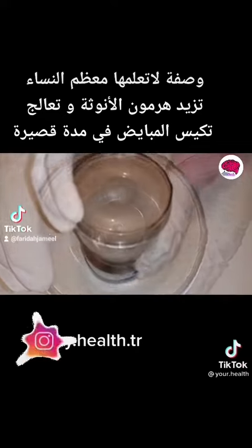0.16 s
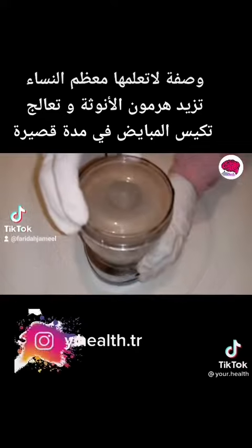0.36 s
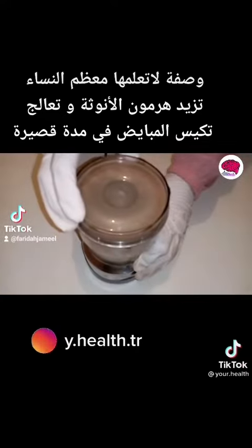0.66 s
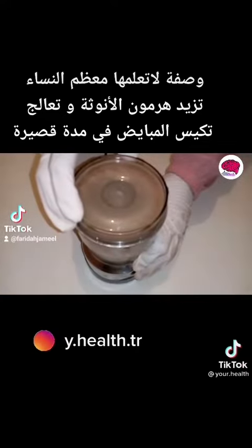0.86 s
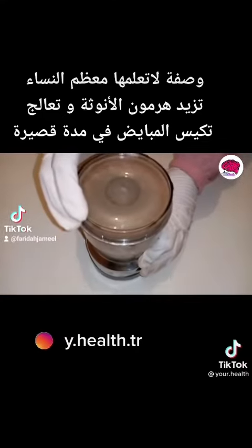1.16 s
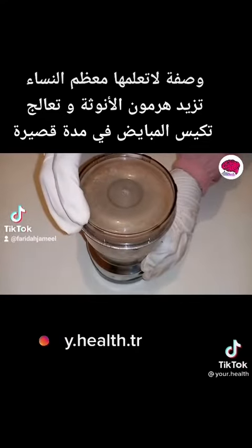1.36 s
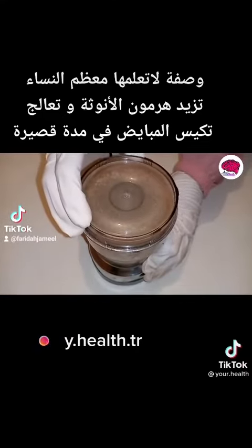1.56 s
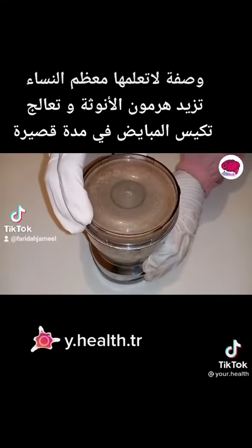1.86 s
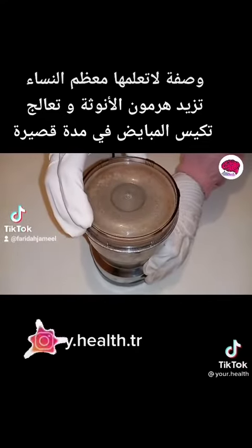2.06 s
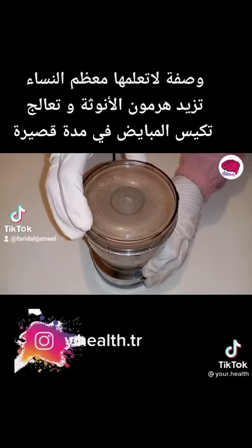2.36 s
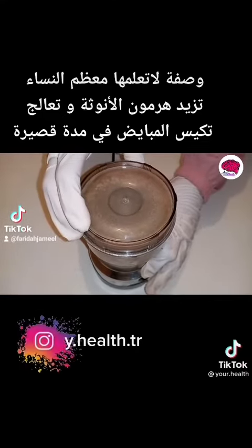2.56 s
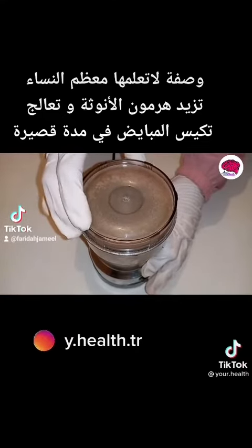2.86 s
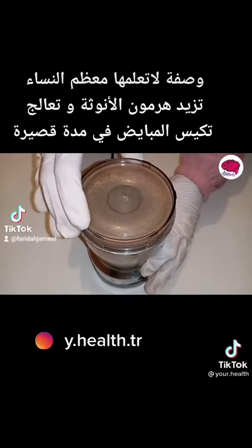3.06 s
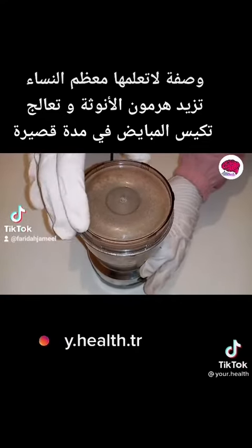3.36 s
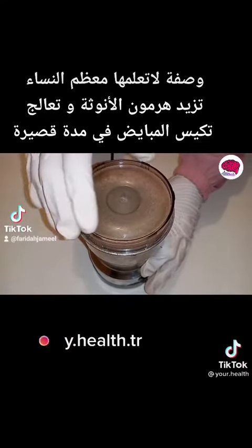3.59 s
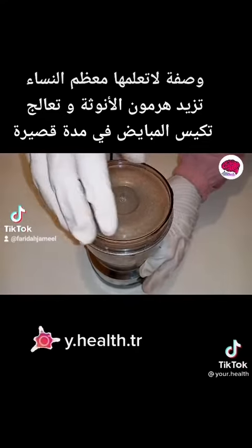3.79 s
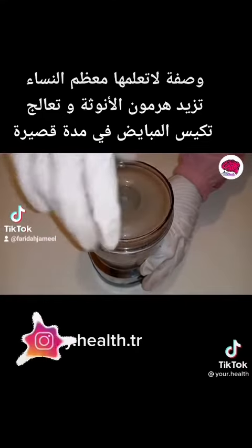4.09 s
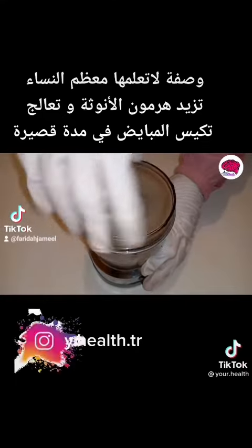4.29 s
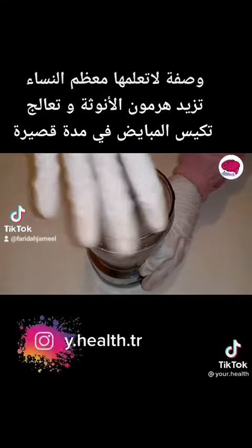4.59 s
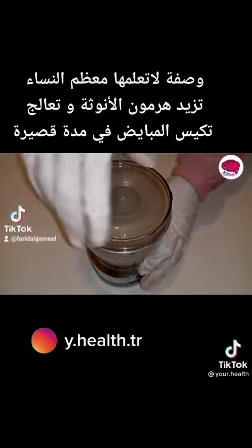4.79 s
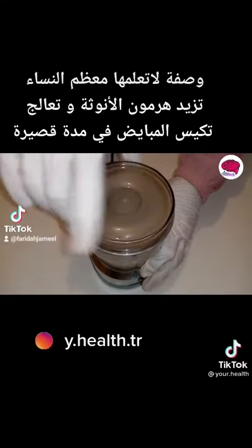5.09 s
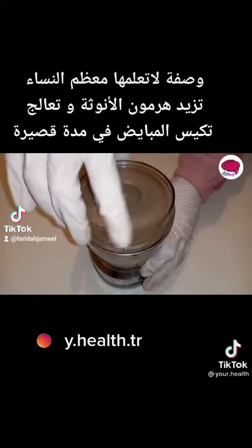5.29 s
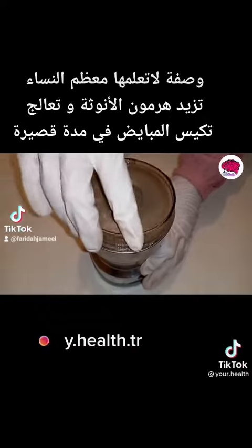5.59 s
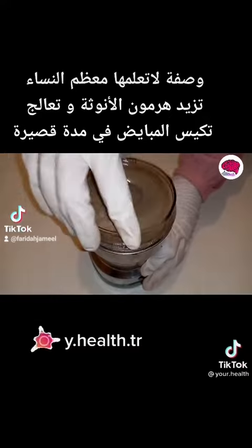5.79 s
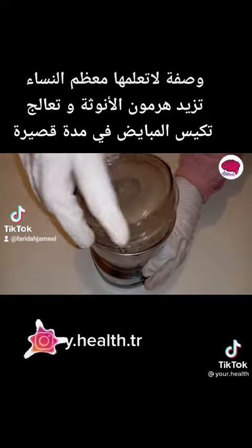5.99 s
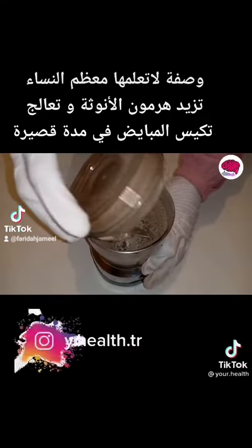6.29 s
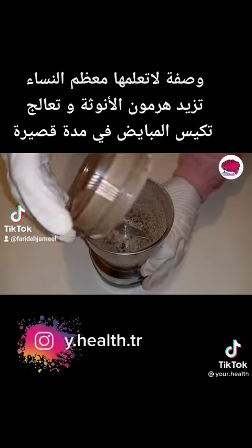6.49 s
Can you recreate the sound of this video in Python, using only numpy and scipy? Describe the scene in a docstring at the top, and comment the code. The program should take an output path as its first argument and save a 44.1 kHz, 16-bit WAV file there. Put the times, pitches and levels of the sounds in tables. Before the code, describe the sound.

A small blade grinder runs at full speed close by, a bright nasal whine over hissing powder and occasional lump knocks. After about two seconds it is switched off; the whine slides lower and fades while grains rattle, ending in a short faint squeak. Then a hand turns the plastic lid with short dry scrapes, knocks and clicks, and light hollow bumps as it lifts. Small kitchen, close stereo microphone, quiet room air.

```python
"""A small blade grinder whines at full speed, with powder hissing and lumps knocking in its bowl.
It is switched off and coasts down: the whine, a sum of sines at multiples of the shaft speed, slides lower.
A short squeak follows, then a gloved hand unscrews the plastic lid with scrapes, knocks and clicks and
lifts it off. Scrapes are noise through resonances; knocks are short bursts with ringing tones.
Two microphone ports pick it all up in a small kitchen."""
import sys
import numpy as np
from scipy import signal
from scipy.fft import rfft, irfft, next_fast_len
from scipy.io import wavfile
from scipy.ndimage import uniform_filter1d, map_coordinates

SR = 44100
rng = np.random.default_rng(int(sys.argv[2]) if len(sys.argv) > 2 else 0)


def dump(signal):
    """Clip the signal to [-1, 1] and save it as 16-bit WAV at the path in sys.argv[1]."""
    limited = np.clip(np.atleast_2d(signal).T, -1, 1)
    pcm = np.round(limited * 32767).astype(np.int16)
    wavfile.write(sys.argv[1], SR, pcm)


def voltage_ratio(decibels):
    """Convert decibels (scalar or array-like) to amplitude ratios, 20 dB per decade."""
    exponent = np.asarray(decibels, float) / 20
    return 10 ** exponent


N = 293265  # length of the sound [samples]

# shaft speed under power, sagging as powder loads the blade: (time [s], speed [turns/s])
SPEED = [(0, 543.5), (.12, 543.5), (.2, 541.3), (.43, 540.5), (.68, 527), (.88, 526.8), (1.08, 521),
         (1.17, 515), (1.32, 520.5), (1.52, 516), (1.75, 518.6), (1.95, 516), (2.04, 517.6), (2.175, 516.5)]
# speeds at heavy, middle and light load: (speed [turns/s])
LOAD_SPEEDS = [517, 527, 541]
# multiples of the shaft speed, before drive and housing: (multiple [1], left level at heavy, middle and
# light load [dB] x 3, right level at the same loads [dB] x 3, phase lead of the left port [rad])
SHAFT_ORDERS = [(1, -19.5, -20, -19, -31, -25.5, -21, 1.83),
                (1.999, -32.5, -38, -32.5, -41.5, -60.5, -46.5, -0.25),
                (3.002, -20.5, -19.5, -19, -33, -35.5, -28, 0),
                (4, -22, -30.5, -32.5, -45, -42.5, -43.5, -0.11),
                (5, -28, -26.5, -20, -31.5, -29.5, -32, -.23),
                (6, -30.5, -29.5, -32.5, -36.5, -43.5, -41.5, -0.04),
                (7, -31.5, -40.5, -28, -40.5, -40, -33, 0.84), (8, -41, -27.5, -31.5, -51.5, -46, -51, 1.5),
                (9, -45, -42, -59, -45.5, -41.5, -42, 1.77), (10, -53.5, -44, -59, -46.5, -50, -50, 1.4),
                (13, -44.5, -46.5, -39, -53.5, -47.5, -44, 1),
                (11, -49.5, -42.5, -36.5, -48, -45, -49, 0.65),
                (12, -32.5, -39, -38.5, -58, -52.5, -51.5, 0.64),
                (14, -40.5, -36.5, -43.5, -51.5, -49, -61, -0.77)]
# overall drive of the whine: (time [s], level [dB])
DRIVE = [(.15, -3.5), (.5, 1), (2.25, -.5), (2.4, -9.5), (2.7, -8.5), (2.95, -18), (3.06, -36),
         (3.12, -65.5)]
# how strongly the housing radiates as the tones slide down: (frequency [Hz], level [dB])
HOUSING = [(120, -4.5), (200, -5.5), (310, -11), (420, -1.5), (520, 4), (700, -12), (870, 6), (1000, 7.5),
           (1150, 0), (1340, -0.5), (1460, -4), (1600, 2), (1850, 0.5), (2100, 2), (2350, -2.5), (2600, -1),
           (2950, 5), (3500, -0.5), (8000, -28.5)]
OFF_S, DRAG_PER_S, FRICTION_HZ_PER_S = 2.175, .92, 175  # switch-off, then air drag and bearing friction
FULL_LOAD_HZ, LOW_ORDERS = 517, 7
# a second, slightly slower whine beats with the first and fades out
BEAT_HZ, BEAT_DIP_S, BEAT_SHARE, BEAT_ENDS_S = 10.3, .05, .55, .3
# orders six to nine swell for a moment while the fifth dips: added dB by order
MOMENT_S, MOMENT_WIDTH_S, MOMENT_DB = 1.15, 0.19, {5: -6, 6: 4.5, 7: 8.5, 8: 10, 9: 8}
# coasting losses: per order above the first, and per squared order above the seventh
FADE_DB_PER_S, TOP_FADE_DB_PER_S = .4, 8
# coasting losses shared by all overtones: a steady one, and one that collapses late
OVERTONE_FADE_DB_PER_S, BLUR_DB_PER_S2 = 8, 36
STOPPED_S = 3.2  # the whine is over

# swirling powder and thrum of the base, the thrum before its boost: (time [s], hiss [dB], thrum [dB])
SWIRL = [(.33, -28.5, -62), (.56, -24, -61), (2.05, -23, -55.5), (2.47, -26.5, -78), (2.8, -24.5, -63),
         (3.15, -30.5, -69), (3.25, -24, -62), (3.36, -34.5, -53), (3.43, -42, -57.5), (3.56, -87, -81)]
# colour of the air roar: (frequency [Hz], level [dB])
ROAR = [(40, -26.5), (100, -24.5), (240, -24.5), (380, -22), (480, -0.5), (580, -3), (670, -38), (780, -31),
        (930, -6.5), (1300, -20.5), (1800, -15), (3000, 3), (4200, -1.5), (6000, -22), (9000, -38)]
# colour of the powder hiss: (frequency [Hz], level [dB])
HISS = [(150, -39.5), (400, -23.5), (640, -23), (770, -26), (900, -10), (1250, -10), (1500, -6), (1850, -2),
        (2240, -5), (3000, -3), (4320, -5), (5300, -7), (6450, -2), (7960, -8), (10500, -8.5),
        (12800, -10.5), (14200, -4), (15000, 0), (16500, 1)]
# colour of the low thrum of the base: (frequency [Hz], level [dB])
THRUM = [(25, -14.5), (60, 0), (110, -1), (200, -17.5), (400, -63)]
# air off the blade: level at the start, end, growth as the powder gets fine, loss while coasting
ROAR_DB, ROAR_ENDS_S, ROAR_GROWS_DB, ROAR_FADE_DB_PER_S = -33, 2.6, 2, 21.5
FINE_FROM_S, FINE_BY_S, RIM_SONG_DB = 0.67, 1.3, -40  # fine powder sings along the rim; level at full hiss

# colour of the kitchen air: (frequency [Hz], level [dB])
AIR_COLOUR = [(20, -23), (60, -2.5), (120, -4.5), (200, -11), (400, -14), (700, -21.5), (1150, -26),
              (1420, -18.5), (1700, -26), (2000, -26), (2900, -22), (4000, -28), (6500, -28.5),
              (9000, -33.5), (16000, -46.5)]
# loudness of the kitchen air: (time [s], level [dB])
AIR_LEVEL = [(3.4, -63.5), (3.7, -64.5), (6.1, -66), (6.3, -65), (6.65, -62)]

# resonances of the base: (centre [Hz], width [Hz], level [dB])
BASE = [(94, 46, -1), (180, 31, -1), (364, 170, -9), (800, 360, -10)]
# resonances of the lid: (centre [Hz], width [Hz], level [dB])
LID = [(650, 50, -11), (866, 25, -3), (935, 110, 1), (1062, 130, 2.5), (1118, 37, -1), (1340, 300, -7),
       (1620, 150, -11), (1860, 220, -10), (2400, 600, -17), (2990, 300, -13), (3470, 420, -17.5)]
# resonances of the rim: (centre [Hz], width [Hz], level [dB])
RIM = [(4300, 900, -12), (5200, 480, -6.5), (6102, 180, 0), (6075, 268, 6), (7090, 367, 0),
       (8700, 1200, -10.5), (14900, 1100, -15.5)]
# resonances of the bowl wall under powder: (centre [Hz], width [Hz], level [dB])
WALL = [(860, 260, 1.5), (1150, 200, -2.5), (1700, 200, -6), (2080, 200, -6), (3000, 280, -1.5)]
# The next three tables give levels before the fixed boosts in knocks().
# hard lumps flung at the bowl: (time [s], base [dB], lid [dB], rim [dB])
LUMPS = [(.139, -23, -28.5, -13), (.31, -36, -32, -25.5), (.499, -42.5, -11.5, -17.5),
         (.88, -42, -22, -18.5), (1.526, -36.5, -20, -21.5), (1.797, -41, -28, -27),
         (2.342, -69.5, -23.5, -24.5), (2.446, -63.5, -25, -23), (2.5, -61.5, -22, -20),
         (2.786, -47, -21, -26), (2.826, -42, -25, -25), (2.925, -24.5, -19, -11.5), (3.012, -60, -30, -25),
         (3.042, -58, -38.5, -22.5), (3.064, -62, -35.5, -15.5), (3.102, -60, -32, -26),
         (3.121, -51.5, -26, -18.5), (3.243, -30, -19, -22), (3.296, -40, -38, -41),
         (3.356, -48, -32.5, -27.5), (3.381, -54, -35, -30.5)]
# the lid knocks and ticks in its thread: (time [s], base [dB], lid [dB], rim [dB])
LID_KNOCKS = [(4.174, -23.5, -29.5, -43), (4.273, -56, -46, -34), (4.481, -57, -33, -57),
              (4.561, -71, -38.5, -46), (4.58, -73, -56, -43.5), (4.826, -51, -17.5, -33),
              (4.858, -30.5, -16, -38), (4.908, -54, -35.5, -22), (4.916, -58, -42, -23),
              (5.059, -58.5, -32, -55), (5.24, -34, -32, -50), (5.35, -47.5, -38.5, -32),
              (5.434, -31, -24.5, -41), (5.461, -48.5, -25.5, -31), (5.47, -27, -10.5, -42.5),
              (5.5, -30, -32, -60), (5.53, -34, -40, -62), (5.64, -72, -46, -62), (5.69, -53, -38, -37.5),
              (5.74, -70, -42, -70), (5.803, -68, -40.5, -31.5), (5.811, -66.5, -64, -26.5),
              (5.829, -58.5, -39.5, -30.5)]
# the tilted lid bumps the bowl: (time [s], base [dB], lid [dB], rim [dB])
BUMPS = [(5.922, -34.5, -31, -37), (5.934, -29.5, -29, -59), (5.965, -45, -41, -56),
         (5.999, -43.5, -46, -56), (6.036, -64, -50, -68)]
# The next three tables give ringing tones; decay is the longest time to fall by 60 dB.
# struck by a lump: (frequency [Hz], level relative to the hit [dB], decay [s])
LUMP_RING = [(375.7, -10.5, 0.027), (1100, -7.5, 0.029), (1390, -4, .015), (2050, -3.5, 0.022),
             (2950, -3, .015)]
# the lid: (frequency [Hz], level relative to the hit [dB], decay [s])
LID_RING = [(375, -14, .05), (800, -6.5, .05), (990, 1.5, 0.037), (1110, -19, .24), (1128, -21, .2),
            (1755, -18, .12), (2340, -21, .12), (2990, -24, .1), (3450, -20, .12), (6260, -5.5, .03),
            (7340, -0.5, .03)]
# the bowl, before it rises in pitch: (frequency [Hz], level relative to the hit [dB], decay [s])
BOWL_RING = [(706, 6.5, 0.13), (783, -3, 0.12), (900, -6, 0.056), (1120, -6, 0.11), (1330, -14, .05),
             (1530, -15, .08), (1760, -17, .08), (3360, -19, 0.073)]
LUMP_RISE_S, LID_RISE_S = .0006, .0016  # a flung lump hits harder than a hand
LOOSE_S, HELD_T60_S = 5.33, 0.03  # until the lid is loose, the thread damps its ring
FREE_S, HOLLOW_LOSS_DB = 5.52, 18  # off the thread, the lid no longer drives the hollow of the bowl
LIFT_S, OPENING_PER_S = 5.95, 1.7  # the hollow rises in pitch as the lid opens: share a second

# the stalling rotor
SQUEAK_S, SQUEAK_LENGTH_S, SQUEAK_HZ, SQUEAK_SAG_HZ_PER_S, SQUEAK_DB = 3.405, 0.13, 886, 130, -42

# strokes of the hand turning the lid:
# (start [s], length [s], scrape [dB], sizzle relative to scrape [dB], rumble relative to scrape [dB])
TURNS = [(3.572, 0.017, -66.5, 10.5, -12), (3.783, .045, -41, -6, -28), (3.857, 0.13, -39, -8, -12),
         (4.07, .107, -35.5, -4, -22), (4.283, .15, -34, -4.5, -10), (4.462, 0.066, -39.5, -9, -30),
         (4.65, 0.045, -65, 4, -22), (4.75, 0.035, -63.5, 11, -20), (4.791, 0.067, -31.5, -8, -19),
         (4.888, 0.029, -40, 0, -4.5), (4.947, 0.094, -64, 10.5, -12), (5.026, 0.07, -35.5, -11, -17),
         (5.093, 0.068, -32.5, -6, -24), (5.229, .094, -36, -3.5, -9.5), (5.321, .06, -51, 7, -19.5),
         (5.413, .025, -47.5, -4.5, 3), (5.45, 0.055, -41, -20, 3.5), (5.632, 0.018, -62.5, 0.5, -23),
         (5.678, .02, -54.5, 4, 7), (5.795, 0.035, -67.5, 26.5, -1), (5.914, 0.021, -56, 1, 3),
         (6.005, 0.037, -71, -21, -8)]
GRIP_S, RELEASE_DB_PER_S, ARCH_DB = 0.017, 433, 1  # a stroke bites fast, is strongest midway, dies off
# the glove brushes faintly along the lid: (start [s], length [s], level [dB], centre [Hz], width [Hz])
BRUSHES = [(4.55, .2, -63, 2050, 130), (6.52, .07, -73, 2780, 450), (6.61, .04, -67, 2400, 1200)]

# how much louder the left port is than the right: (frequency [Hz], difference [dB])
BALANCE = [(60, 4.5), (240, 3.5), (700, 3.5), (1200, 6.5), (2000, 11.5), (3700, -2), (6500, 6.5), (9000, 0),
           (15000, 1.5)]
# share of the sound that comes off the walls: (frequency [Hz], share [0-1])
WET = [(100, .1), (900, .1), (3000, .09), (15000, .07)]
# how long the room rings, as time to fall by 60 dB: (frequency [Hz], decay [s])
ROOM = [(150, 0.075), (1000, 0.25), (6000, 0.21), (15000, 0.02)]
# share of a steady noise that differs from port to port: (frequency [Hz], share [0-1])
OWN = [(60, 0.7), (300, 0.7), (900, 0.3), (2000, 0.6), (5000, 0.9), (15000, 0.7)]
# fixed narrow dips and a steep top edge in the whole mix: (frequency [Hz], level [dB])
MIX_COLOUR = [(20, -6), (50, 0), (3900, 0), (4250, -5), (4600, 0), (11700, 0), (12300, -9), (12900, 0),
              (13400, 0), (13800, -10), (14200, 0), (15500, 0), (15900, -40)]
LAG_S = 0.0010643  # the left port is the farther one


def unit(x):
    """Scale to rms 1."""
    return x / np.sqrt(np.mean(x ** 2) + 1e-20)


def along(points, hz):
    """Read a curve of (Hz, value) points on a log frequency axis."""
    f, v = np.transpose(points)
    return np.interp(np.log(hz + 1), np.log(f + 1), v)


def curves(rows):
    """One value per sample for each column after the time."""
    s, *cols = np.transpose(rows)
    return [np.interp(np.arange(N) / SR, s, c) for c in cols]


def wobble(rate, count=N):
    """A smooth random curve, rate knots a second."""
    knots = rng.standard_normal(int(count * rate / SR) + 4)
    return map_coordinates(knots, [np.arange(count) * rate / SR])


def filtered(x, response):
    """Multiply the spectrum of x by a response, given as a function of frequency."""
    m = next_fast_len(N + SR // 2)
    return irfft(rfft(x, m) * response(np.fft.rfftfreq(m, 1 / SR)), m)[..., :N]


def rung(x, modes):
    """Send x through resonances side by side, with alternating signs."""
    def response(f):
        total = 0
        for k, (centre, width, db) in enumerate(modes):
            peak = 1j * f * width / (centre * centre - f * f + 1j * f * width)
            total = total + (-1) ** k * voltage_ratio(db) * peak
        return total
    return filtered(x, response)


def gritty(grit_db, grit_rate):
    """Three noises with the same uneven grains: one for both ports, one for each alone."""
    return rng.standard_normal((3, N)) * voltage_ratio(grit_db * wobble(grit_rate))


def noise(spectrum, grit_db, grit_rate):
    """Coloured gritty noise of rms 1."""
    return unit(filtered(gritty(grit_db, grit_rate), lambda hz: voltage_ratio(along(spectrum, hz))))


def patchy(x, patchy_db):
    """Random patches of gain in time and frequency, at rms 1."""
    z = signal.stft(x, nperseg=512)[2]
    field = uniform_filter1d(rng.standard_normal(z.shape[1:]), size=4, axis=0)
    field = uniform_filter1d(field, size=10, axis=1)
    return unit(signal.istft(z * voltage_ratio(patchy_db * unit(field)), nperseg=512)[1][:, :N])


def whine():
    """Shaft orders as sines; their balance shifts with load, and the high ones fade once the current is cut."""
    n = round(STOPPED_S * SR)
    t = np.arange(n) / SR
    coasting = np.clip(t - OFF_S, 0, 1)  # seconds since switch-off
    powered = np.clip((2.2 - t) / 0.0091, 0, 1)
    # air drag grows with speed, bearing friction is constant
    stall = FRICTION_HZ_PER_S / DRAG_PER_S
    speed = (curves(SPEED)[0][:n] + stall) * np.exp(-DRAG_PER_S * coasting) - stall
    turn = 2 * np.pi * np.cumsum(speed + .4 * wobble(40, n)) / SR
    slow = np.minimum(speed, FULL_LOAD_HZ)
    drive_db = curves(DRIVE)[0][:n]
    moment = np.exp(-((t - MOMENT_S) / MOMENT_WIDTH_S) ** 2)
    second = BEAT_SHARE * np.clip(1 - (t / BEAT_ENDS_S) ** 2, 0, 1)

    hum_level = voltage_ratio(np.array([[-46], [-51]]) + 1.5 * wobble(7.3, n))  # left, right
    out = hum_level * powered * np.sin(2 * np.pi * 100 * t - [[.65], [0]])  # mains hum
    for k, *levels, lead in SHAFT_ORDERS:
        overtone = k > 1
        slide_db = along(HOUSING, k * slow) - along(HOUSING, k * FULL_LOAD_HZ)
        slide_db += MOMENT_DB.get(k, 0) * moment
        slide_db -= (FADE_DB_PER_S * (k - 1) + TOP_FADE_DB_PER_S * max(k - LOW_ORDERS, 0) ** 2) * coasting
        slide_db -= overtone * (OVERTONE_FADE_DB_PER_S * coasting + BLUR_DB_PER_S2 * coasting ** 2)
        beat = 1 - second / max(k - 2, 1) * np.exp(-2j * np.pi * k * BEAT_HZ * (t - BEAT_DIP_S))
        flutter_db = (.4 + .22 * k) * wobble(14, n) + .15 * (k - 1) * wobble(3, n)
        # rough while coasting
        flutter_db += (1.5 + 2.5 * overtone + 2.5 * coasting) * (1 - powered) * wobble(45, n)
        throb = 1 + 0.05 * overtone * powered * np.sin(2 * np.pi * 100 * t)  # mains pull on the rotor
        jitter = .002 * k * k + .025 * k + (1.5 * overtone + .15 * k) * coasting  # phase wander [rad]
        phase = rng.uniform(0, 2 * np.pi) + jitter * wobble(60, n) + np.angle(beat)
        for side in range(2):  # left, right
            load_db = np.interp(speed, LOAD_SPEEDS, levels[3 * side:3 * side + 3])
            level = np.sqrt(2) * voltage_ratio(load_db + drive_db + slide_db + flutter_db)
            shift = (lead - 2 * np.pi * k * speed * LAG_S) * (1 - side)
            out[side] += level * throb * abs(beat) * np.sin(k * turn + phase + shift)
    return np.pad(out, [(0, 0), (0, N - n)])


def swirl():
    """The blade drives a roar of air; powder hisses along the wall and gets lumpier as it slows."""
    hiss_db, thrum_db = curves(SWIRL + [(SWIRL[-1][0] + 0.024, -120, -120)])
    t = np.arange(N) / SR
    blowing = np.clip((ROAR_ENDS_S - t) / 0.21, 0, 1)
    fine = np.clip((t - FINE_FROM_S) / (FINE_BY_S - FINE_FROM_S), 0, 1)

    gusts_db = .6 * wobble(6) + 1.2 * wobble(25)
    roar_db = ROAR_DB + ROAR_GROWS_DB * fine - ROAR_FADE_DB_PER_S * np.clip(t - OFF_S, 0, 1) + gusts_db
    roar = voltage_ratio(roar_db) * blowing * patchy(noise(ROAR, grit_db=1.0, grit_rate=360), patchy_db=1.8)

    boosted_db = thrum_db + 2.4 * wobble(6.2) + 5.3 * (1 - blowing)  # stronger once the roar is gone
    thrum = voltage_ratio(boosted_db) * noise(THRUM, grit_db=4.0, grit_rate=17)

    lumps_db = (.8 + 1.2 * (1 - blowing)) * wobble(90) + .6 * wobble(9)
    song_db = RIM_SONG_DB + hiss_db - hiss_db.max() + lumps_db
    rim_song = voltage_ratio(song_db) * fine * unit(rung(gritty(grit_db=5.5, grit_rate=900), RIM[2:5]))
    hiss = voltage_ratio(hiss_db + lumps_db) * patchy(noise(HISS, grit_db=2.0, grit_rate=900), patchy_db=3)
    return roar + thrum + rim_song + hiss


def kitchen_air():
    """The quiet air of the kitchen: coloured noise with a slightly unsteady level."""
    level = voltage_ratio(curves(AIR_LEVEL)[0] + 0.91 * wobble(28))
    return level * noise(AIR_COLOUR, grit_db=2.0, grit_rate=180)


def knocks():
    """Each contact is a short burst into base, lid and rim, and sets the struck part ringing."""
    base, lid, rim, ring = np.zeros((4, N + SR))
    t = np.arange(SR // 3) / SR

    def press(rise_s):
        """The contact builds up and lets go."""
        return (t / rise_s) ** 2 * np.exp(2 - 2 * t / rise_s)

    def steep(x):
        """A small base radiates no deep bass."""
        return filtered(x, lambda f: (1j * f / (85 + 1j * f)) ** 3)

    kinds = [(LUMPS, LUMP_RING), (LID_KNOCKS, LID_RING), (BUMPS, BOWL_RING)]
    contacts = [(*row, modes) for rows, modes in kinds for row in rows]
    for s, base_db, lid_db, rim_db, modes in contacts:
        start = round((s - .0015) * SR)
        at = slice(start, start + len(t))
        burst = np.sign(rng.standard_normal(len(t)))
        hollow_db = -HOLLOW_LOSS_DB * (s > FREE_S and modes is LID_RING)
        rise_s = LUMP_RISE_S if modes is LUMP_RING else LID_RISE_S
        base[at] += voltage_ratio(base_db + 21.0) * press(rise_s=0.00032)
        lid[at] += voltage_ratio(lid_db + 5.0 + hollow_db) * press(rise_s) * burst
        rim[at] += voltage_ratio(rim_db + 10.5) * press(rise_s=0.0029) * burst
        for hz, db, t60 in modes:
            t60 = t60 if s > LOOSE_S else min(t60, HELD_T60_S)
            hz *= 1 + OPENING_PER_S * max(s - LIFT_S, 0) * (hz < 1000)  # each later bump rings higher
            ring_db = (rim_db if hz > 4000 else lid_db) + db
            ring_db += hollow_db * (600 < hz < 1100) + rng.normal(0, 2)
            decay = voltage_ratio(ring_db - 60 * t / max(t60, .005)) * (1 - np.exp(-t / 0.0011))
            ring[at] += decay * np.sin(2 * np.pi * hz * rng.normal(1, hz / 210000.0) * t)
    return steep(rung(base[:N], BASE)) + rung(lid[:N], LID) + rung(rim[:N], RIM) + ring[:N]


def rattle():
    """Stray lumps tick against the bowl at random while the blade slows."""
    rows = rng.random((130, 2))
    ticks = np.zeros(N)
    at = ((2.3 + 1.1 * rows[:, 0]) * SR).astype(int)
    ticks[at] = voltage_ratio(-12 + 5.5 * -np.log(1 - .95 * rows[:, 1]))  # many weak ticks, few strong ones
    bursts = signal.fftconvolve(ticks, np.hanning(60))[:N] * rng.standard_normal(N)
    return voltage_ratio(-23.5) * rung(bursts, RIM) + voltage_ratio(-14) * rung(bursts, WALL)


def squeak():
    """A short stick-slip tone with its octave, swelling and fading while its pitch sinks."""
    t = np.clip(np.arange(N) / SR - SQUEAK_S, 0, SQUEAK_LENGTH_S)
    turn = 2 * np.pi * (SQUEAK_HZ * t - SQUEAK_SAG_HZ_PER_S * t ** 2 / 2) + .5 * wobble(70)
    swell = np.sin(np.pi * t / SQUEAK_LENGTH_S) ** 2
    return voltage_ratio(SQUEAK_DB) * swell * (np.sin(turn) + voltage_ratio(-14) * np.sin(2 * turn))


def scrapes():
    """Powder caught in the thread: gritty noise into base, lid and rim under each turn."""
    t = np.arange(N) / SR
    scrape, sizzle, rumble = np.zeros((3, N))
    for s, length, db, sizzle_db, rumble_db in TURNS:
        at = slice(round(s * SR), round((s + length + .2) * SR))
        u = t[at] - s
        arch_db = ARCH_DB * np.sin(np.pi * np.clip(u / length, 0, 1))
        arch_db -= RELEASE_DB_PER_S * np.clip(u - length, 0, 1)
        stroke = np.clip(u / GRIP_S, 0, 1) ** 2 * voltage_ratio(db + arch_db)
        scrape[at] += stroke
        sizzle[at] += stroke * voltage_ratio(sizzle_db)
        rumble[at] += stroke * voltage_ratio(rumble_db)

    def rub(modes, grit_db, shift_db):
        """As the grip moves, each resonance swells and fades on its own."""
        grit = gritty(grit_db, grit_rate=1500)
        total = 0
        for k, mode in enumerate(modes):
            gain = voltage_ratio(shift_db * (wobble(12) + .7 * wobble(60)))
            total = total + (-1) ** k * gain * rung(grit, [mode])
        return unit(total)

    catch = voltage_ratio(1.3 * wobble(80) + wobble(300))  # quick unevenness shared by lid and rim
    lid = scrape * catch * rub(LID, grit_db=4.5, shift_db=2.8)
    rim = sizzle * catch * rub(RIM, grit_db=4, shift_db=1.5)
    return lid + rim + rumble * rub(BASE[1:3], grit_db=-0.5, shift_db=1.5)


def brushes():
    """Soft swells of noise in one broad resonance each."""
    t = np.arange(N) / SR
    total = 0
    for s, length, db, hz, width in BRUSHES:
        swell = np.sin(np.pi * np.clip((t - s) / length, 0, 1))
        rustle = unit(rung(gritty(grit_db=2.5, grit_rate=300), [(hz, width, 0)]))
        total = total + voltage_ratio(db) * swell * rustle
    return total


def ports(steady, sharp):
    """Sound reaches the left port later but mostly louder; each port has its own echo and share of noise."""
    def share(points, f):
        return np.clip(along(points, f), 0, 1)

    # room echo: noise that dies away at its own pace in each frequency band
    hz, t, z = signal.stft(rng.standard_normal((2, SR // 3)), SR, nperseg=256)
    z = z * voltage_ratio(-60 * t / along(ROOM, hz)[:, None])
    tail = signal.istft(z / np.linalg.norm(z, axis=2, keepdims=True), SR, nperseg=256)[1]
    tail = tail / np.linalg.norm(tail, axis=1, keepdims=True)

    common = sharp + filtered(steady[0], lambda f: np.sqrt(1 - share(OWN, f)))
    lagged = filtered(common, lambda f: np.array([np.exp(-2j * np.pi * f * LAG_S), np.ones(len(f))]))
    direct = lagged + filtered(steady[1:], lambda f: np.sqrt(share(OWN, f)))
    echo = signal.fftconvolve(direct, tail, axes=1)[:, :N]
    both = filtered(direct, lambda f: np.sqrt(1 - share(WET, f)))
    both = both + filtered(echo, lambda f: np.sqrt(share(WET, f)))
    return filtered(both, lambda f: voltage_ratio(along(BALANCE, f) / 2 * np.array([[1], [-1]])))


def scene():
    """Grinder, lid and kitchen air; the whine carries its own levels and delay for the two ports."""
    steady = swirl() + kitchen_air() + scrapes() + brushes()
    sharp = knocks() + rattle() + squeak()
    return whine() + ports(steady, sharp)


def top_cut(x):
    """Nothing passes above the cut-off."""
    return signal.sosfilt(signal.butter(12, 16860, fs=SR, output="sos"), x)


def record(dry):
    """The whole mix gets fixed narrow dips and a steep top edge."""
    mix = filtered(dry, lambda hz: voltage_ratio(along(MIX_COLOUR, hz)))
    return top_cut(mix)


dry = scene()
out = record(dry)
dump(out)
```